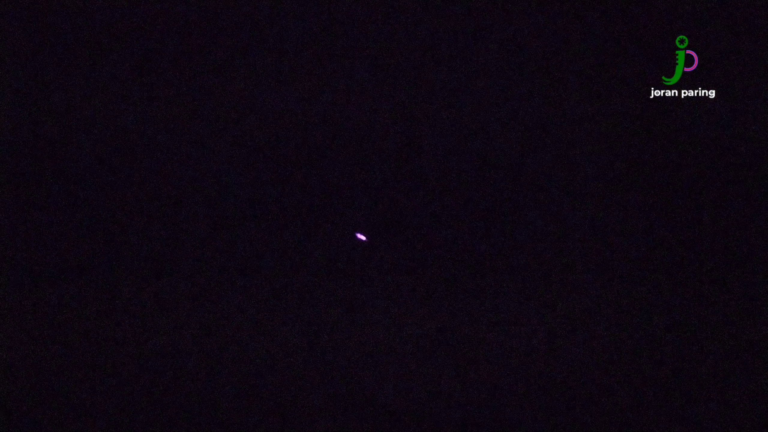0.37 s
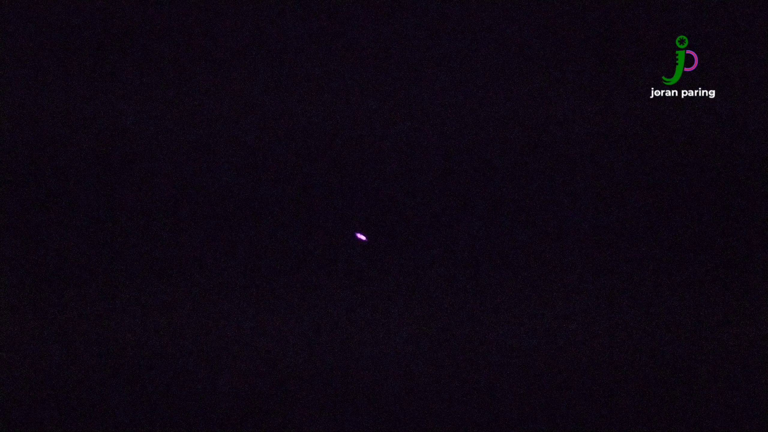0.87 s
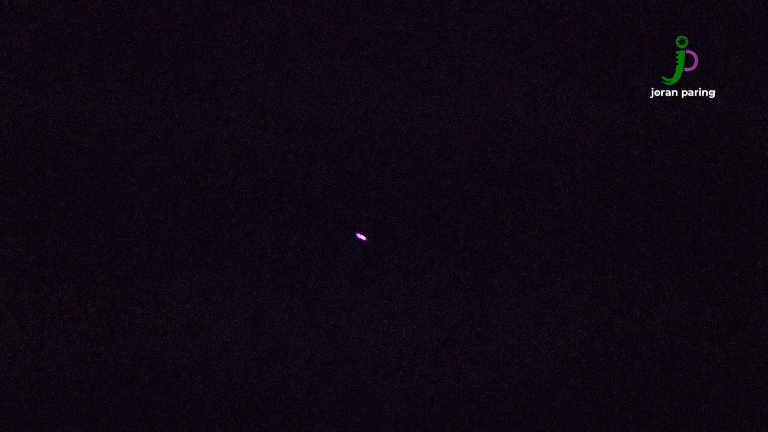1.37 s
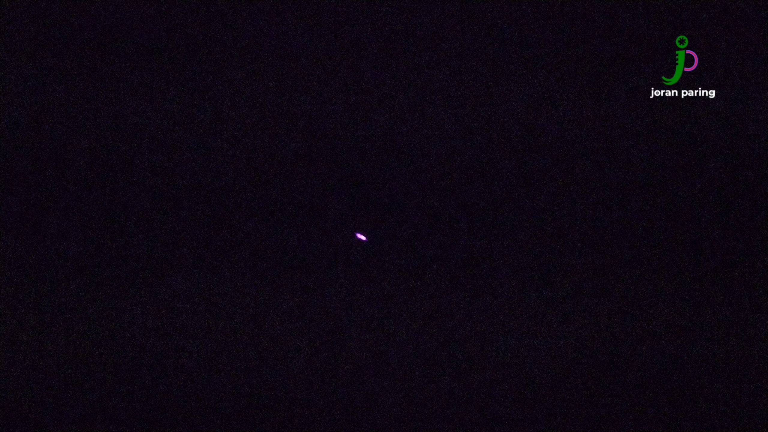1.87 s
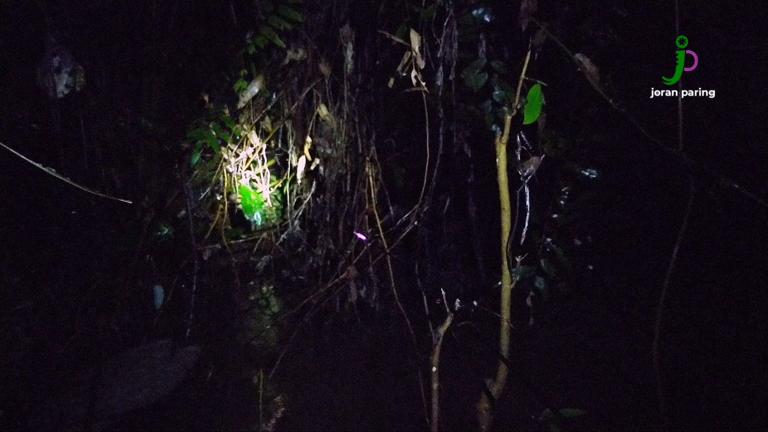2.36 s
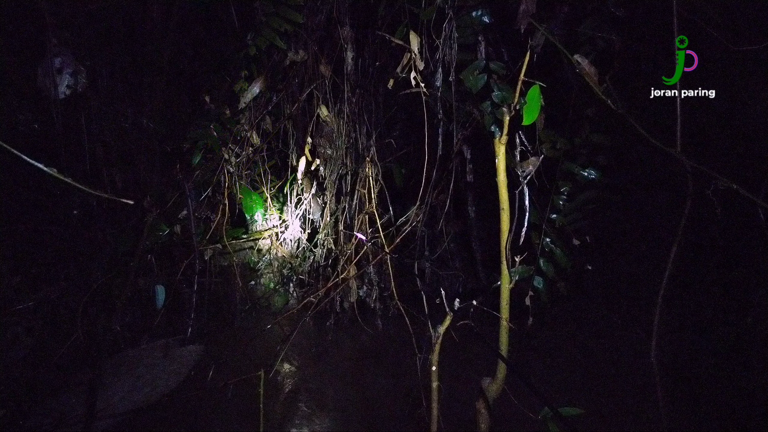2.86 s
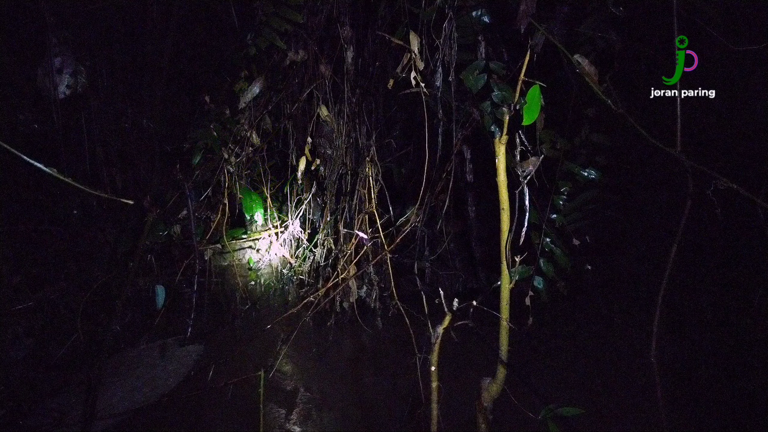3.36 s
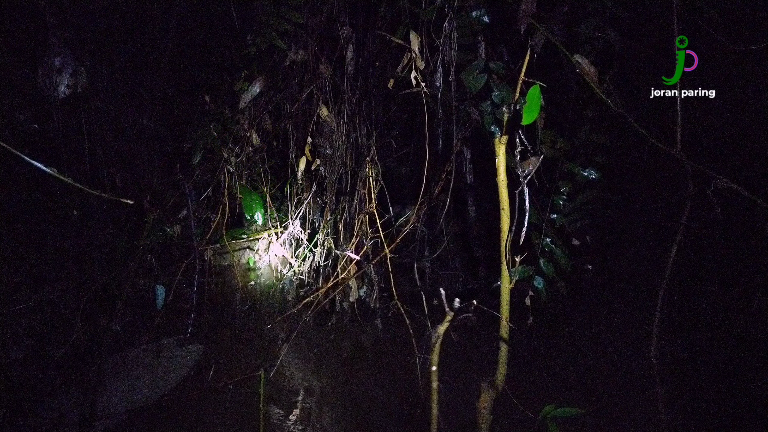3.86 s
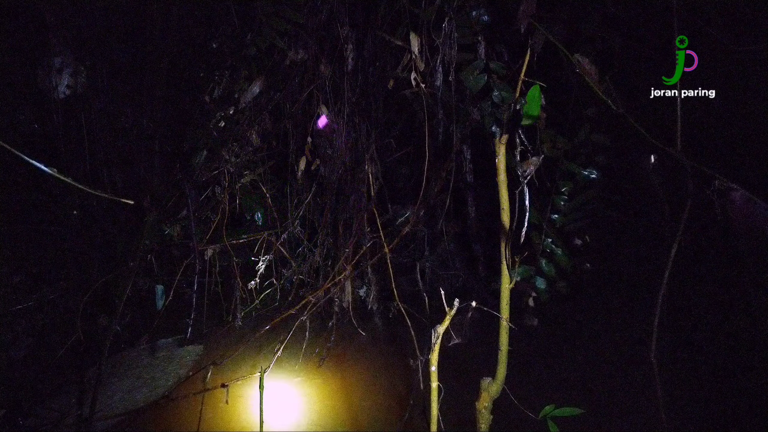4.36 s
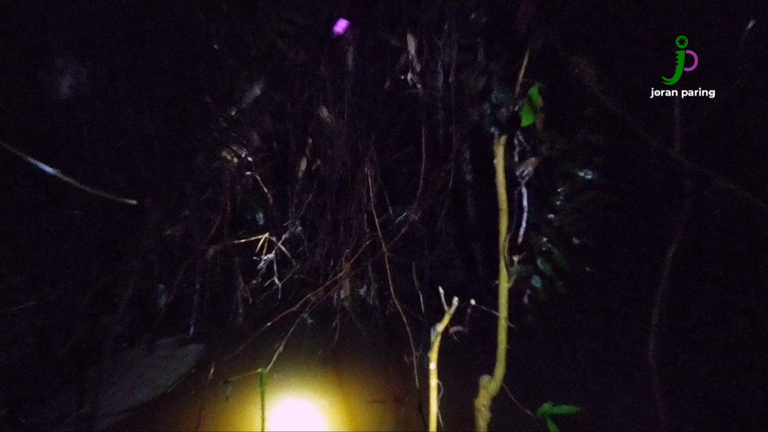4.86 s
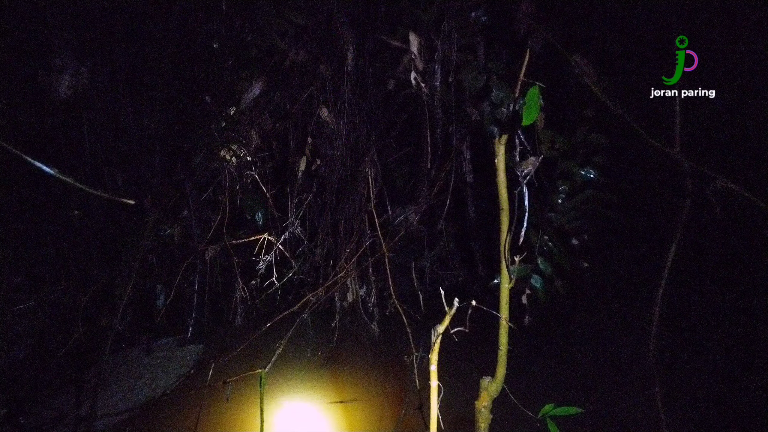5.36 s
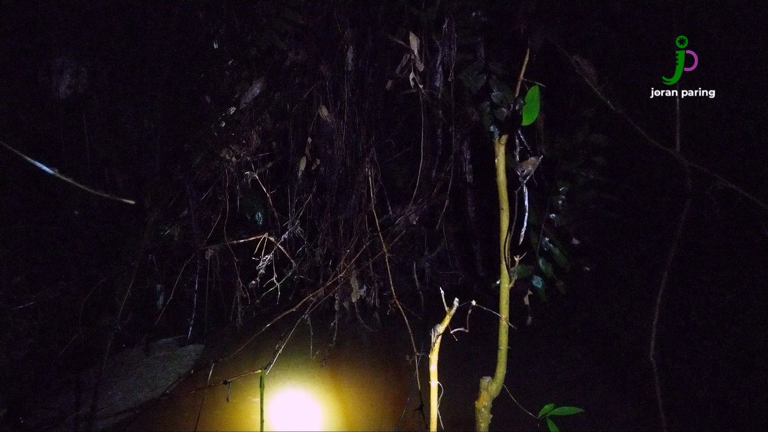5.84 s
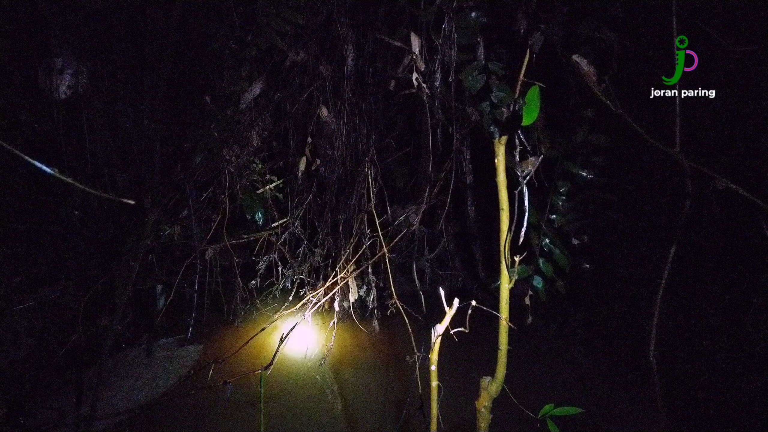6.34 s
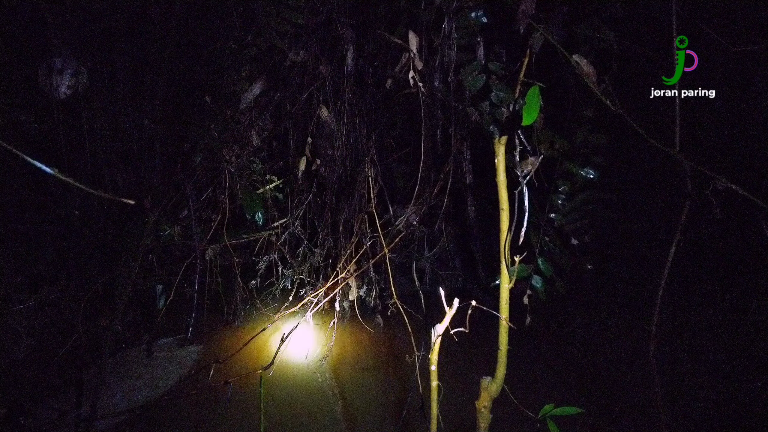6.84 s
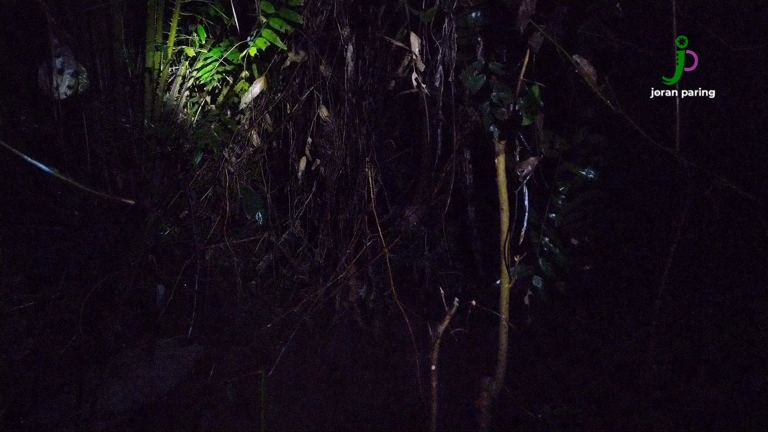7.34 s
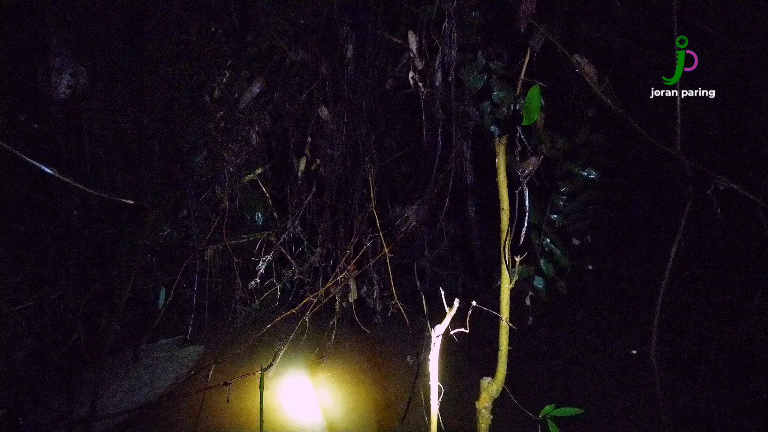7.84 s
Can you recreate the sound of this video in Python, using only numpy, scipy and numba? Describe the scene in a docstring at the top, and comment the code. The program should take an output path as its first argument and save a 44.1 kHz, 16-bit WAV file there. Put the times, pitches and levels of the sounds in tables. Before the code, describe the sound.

Quiet night beside a flooded, wooded ditch, heard through a hand-held stereo recorder. Distant insects shimmer and chirp over a low engine hum while cloth and leaves rustle close by. A loud torch click comes at two seconds, a second soon after, and a near cricket begins a high, rapid trill, stronger on the right. Twigs snap at four seconds; the trill stops around five and returns near the end.

```python
"""Beside a flooded wooded ditch at night, a near cricket trills in long bouts, louder on the right.
It sings by stridulation, three tone bursts a wing stroke; other insects call and chirp further off over a chorus.
A torch switch, twigs and knocks ring as decaying modes; cloth and leaves rustle as uneven noise.
Water plops are gliding bubble tones, distant engines are wavering sines, and air and wind are coloured noise.
Two ports of a hand-held recorder take it all in, and its limiter ducks after the loudest click."""
import sys
import numpy as np
from scipy import signal
from scipy.fft import rfft, irfft, next_fast_len
from scipy.io import wavfile
from scipy.ndimage import uniform_filter1d
from numba import njit

SR = 44100
rng = np.random.default_rng(int(sys.argv[2]) if len(sys.argv) > 2 else 0)


def magnitude_from_level(level_db):
    """Linear magnitude for a level in decibels (20 dB per decade)."""
    exponent = np.asarray(level_db, float) / 20
    return 10 ** exponent


def dump(signal):
    """Clip the signal to [-1, 1] and save it as 16-bit WAV at the path in sys.argv[1]."""
    limited = np.clip(np.atleast_2d(signal).T, -1, 1)
    pcm = np.round(limited * 32767).astype(np.int16)
    wavfile.write(sys.argv[1], SR, pcm)


N = 362061
T = np.arange(N) / SR

# near cricket bouts: (start [s], end [s], settled level [dB], share of a stroke done at the first pace row [0-1])
BOUTS = [(2.128, 5.081, -30, .29), (7.482, 8.3, -30, .426)]
# wing pace, one list a bout: (time [s], rate [strokes/s])
STROKE_PACE = [
    [(2.14, 67.32), (2.506, 66.34), (2.873, 66.0), (3.239, 65.82), (3.605, 65.66), (3.971, 66.14),
     (4.338, 64.6), (4.704, 65.79), (5.07, 64.12)],
    [(7.5, 66.61), (7.733, 67.32), (7.967, 65.58), (8.2, 67.02)],
]
# lead, main and trailing bursts of a stroke:
# (place in stroke [0-1], pitch above the wing [Hz], time to peak once the outer bursts have grown [s])
BURSTS = [(.03, 250, .0012), (.29, -10, .0016), (.57, 130, .0012)]
WING_HZ, COLD_DROP_HZ, WARM_S = 7808, 167, 0.36  # the wing starts flat and settles as it warms
SLUR_HZ, SLUR_S = 60, .04  # the first strokes slur up from below
ATTACK_S, RELEASE_S, FRESH_DB, TIRE_S = 0.04, 0.02, 1.5, 0.6  # a bout opens louder, then eases
LEAD_DB, TRAIL_DB = -4.5, -7  # outer bursts at full strength
LEAD_LATE_DB, LEAD_S, TRAIL_LATE_DB, TRAIL_S = -30, .33, -11, .55  # their shortfall at first and growth time
LONG_AT_FIRST = .55  # bursts start longer by this share, easing with the trailing burst's growth

# short calls further off: (start [s], end [s], pitch [Hz], rate [strokes/s], level [dB], left minus right [dB])
FAR_CALLS = [(1.85, 1.99, 8680, 100, -49, 12), (1.92, 2.35, 8980, 100, -46.5, 13),
             (1.865, 1.975, 3850, 90, -43, 0), (5.58, 5.674, 7250, 16, -44, -6),
             (5.86, 6.0, 7360, 16, -49, -11)]
# two chirping crickets, lower then upper: (middle of chirp [s], relative level [dB])
CHIRPS = [
    [(.1, -44.5), (.25, -41), (.77, -38), (1.29, -40), (1.74, -39), (2.2, -37.5), (2.68, -41), (3.16, -42),
     (3.57, -40), (4.17, -43), (4.63, -40.5), (5.2, -43.5), (5.7, -42), (6.15, -40), (6.53, -38),
     (7.0, -39), (7.31, -44), (7.67, -42), (7.82, -45), (8.09, -42)],
    [(.24, -50), (.67, -40), (1.16, -43), (1.48, -40), (2.03, -39), (2.84, -45), (4.27, -49), (4.62, -48),
     (5.84, -42), (6.3, -44), (7.17, -39), (7.82, -48), (8.1, -45)],
]
# one entry a chirping cricket: (pitch [Hz])
CHIRP_HZ = (5040, 5140)
# one entry a chirping cricket: (rate [strokes/s])
CHIRP_RATE = (41, 38)
CHIRP_HALF_S = 0.09  # a chirp swells and fades over about twice this
CHIRP_LEFT_LAG_S = .0001  # offsets part of the right port's lag
# bands of massed distant insects: (centre [Hz], width [Hz], level [dB])
CHORUS = [(4900, 2060, -49.5), (6240, 300, -57.5), (6870, 420, -60), (8490, 1200, -53.5),
          (10500, 1100, -64)]

# torch switch clicks, runs of ticks:
# (loudest tick [s], peak [dB], its tilt [dB/octave], gap between ticks [s], build-up a tick [dB])
SWITCH = [(2.0394, 0, 2.5, 0.0018, 41), (2.2739, 11.5, 11, 0.0018, 18.5)]
# switch resonances: (frequency [Hz], relative level [dB], free t60 [s])
SWITCH_MODES = [(2030, -4, 0.019), (2360, -20, 0.013), (3600, -7.5, 0.0087), (4180, 2.5, 0.014),
                (4920, -5, 0.0066), (6470, 4, 0.0075), (7140, 4, 0.0076), (8810, -9, 0.024),
                (10140, -17, 0.0061), (12300, -19, 0.0044)]
# one entry a click: (share of the ring times left by the fingers [0-1])
SWITCH_RING_SHARES = (1, .7)
# twig snaps, runs of ticks:
# (loudest tick [s], peak [dB], its tilt [dB/octave], gap between ticks [s], build-up a tick [dB])
SNAPS = [(3.9995, -11.5, 9.2, .0013, 3.8)]
# single twig crackles: (time [s], peak [dB], tilt [dB/octave])
TWIGS = [(1.0799, -20.5, 1), (3.9332, -22, -4), (3.9655, -22, -5), (7.309, -19.5, -3), (7.781, -17, -24),
         (7.855, -22, 0)]
# resonances of all twigs: (frequency [Hz], relative level [dB], t60 [s])
TWIG_MODES = [(1750, -15, 0.0024), (3700, 8, 0.005), (6370, 8.5, 0.0036), (8160, 2, 0.013),
              (10430, -4, 0.0083), (13700, -16, 0.003)]
SWITCH_FALL_DB, SNAP_FALL_DB = 8, 5  # level lost a tick after the loudest
DULLING_DB = 3.5  # tilt lost a tick either side, dB/octave
# dull knocks on something held: (time [s], peak [dB], tilt [dB/octave])
KNOCKS = [(3.061, -26, -8), (3.402, -38, 3), (3.808, -27, 5), (3.814, -26, -1), (4.2925, -26, -1),
          (4.296, -25, -3), (4.813, -28.5, -5), (5.564, -38, 0), (5.721, -31, 5), (6.258, -30, -2),
          (6.727, -35, -2), (7.308, -23, -2)]
# knock resonances: (frequency [Hz], relative level [dB], t60 [s])
KNOCK_MODES = [(430, -7, .04), (590, -7, .035), (840, 0, .045), (980, 1, .045), (1420, 0, .035),
               (1850, -5, .03), (2800, -7, .015)]

# steady fidget of cloth and leaves: (time [s], bright rustle [dB], low rub [dB])
RUSTLE = [(0, -48, -52), (.7, -50.5, -53.5), (2.0, -50.5, -55.5), (2.5, -49, -55), (3.2, -57, -64),
          (3.45, -45.5, -54), (3.65, -38.5, -55.5), (3.95, -49.5, -54.5), (4.4, -52.5, -57.5),
          (5.2, -54, -59.5), (5.9, -50, -53.5), (6.6, -54.5, -56.5), (7.2, -48, -56), (7.765, -49, -53),
          (7.785, -43, -42), (7.97, -46.5, -48.5), (8.21, -46, -42.5)]
# single swishes: (peak [s], rise [s], bright rustle [dB], low rub [dB])
SWISHES = [(0.01, 0.036, -41.5, -60), (.18, 0.014, -39, -47), (.89, 0.03, -45, -54), (1.05, 0.04, -42, -59),
           (1.46, 0.05, -49, -50), (1.93, 0.024, -56, -54), (2.384, 0.029, -38, -65), (3.07, .04, -51, -53),
           (3.58, 0.068, -38, -47), (3.7, 0.057, -49, -61), (3.83, 0.022, -47, -46),
           (4.03, 0.06, -40, -49.5), (4.9, 0.068, -46.5, -60), (4.99, 0.01, -42, -57),
           (5.1, 0.03, -47, -68), (5.25, 0.03, -55, -60), (5.4, 0.035, -45, -67), (5.71, 0.026, -59, -53),
           (6.93, 0.061, -53, -61), (7.29, 0.026, -46, -50), (7.86, 0.038, -39.5, -38.5),
           (8.07, 0.061, -43, -43), (8.15, .06, -45, -49)]
FADE = 0.98  # a swish dies over this times its rise
# bands of the low rub: (centre [Hz], width [Hz], relative level [dB])
RUB = [(845, 870, 1), (1456, 740, -4.5), (2098, 1810, 4.5), (4010, 850, 0), (4890, 1980, 1)]
# brief narrow hisses, as of leaves brushing: (middle [s], half length [s], pitch [Hz], width [Hz], level [dB])
HISSES = [(0.16, 0.018, 10600, 1500, -49.5), (0.488, .015, 10400, 1500, -52),
          (3.05, 0.055, 12400, 1500, -58), (3.579, 0.018, 10500, 900, -38),
          (3.615, 0.091, 3100, 1500, -44.5), (3.44, .05, 3000, 1500, -53), (3.75, .05, 2980, 1500, -50),
          (3.811, .008, 2700, 900, -36.5), (3.95, 0.031, 10800, 900, -48),
          (3.999, 0.0036, 10700, 1600, -23.5), (4.85, .012, 13000, 3000, -54),
          (5.26, .045, 11500, 600, -61), (5.585, 0.054, 10900, 900, -56), (5.78, .035, 12800, 2000, -58),
          (5.89, .025, 10200, 900, -53), (5.99, .035, 13000, 1500, -59), (6.963, .06, 10800, 700, -57),
          (7.205, 0.016, 10900, 400, -60), (7.302, .012, 11300, 900, -53), (7.58, .01, 12500, 1200, -56),
          (7.67, .01, 13800, 1200, -56), (8.165, .01, 10500, 1200, -48)]
HISS_LEFT_LAG_S = .00025  # the leaves brush nearer the middle than the hand
# water plops: (time [s], peak [dB], starting pitch [Hz])
PLOPS = [(5.745, -42, 650), (6.435, -40, 610), (6.454, -42, 580), (6.587, -42, 557), (6.881, -40.5, 557),
         (7.606, -42, 605)]
PLOP_T60_S = .06

# distant engines: (time [s], drone [dB], second engine [dB], deep throb [dB])
ENGINES = [(0, -55, -58, -58), (.5, -58.5, -52, -49), (2.2, -56, -54, -50), (3, -55, -56.5, -60),
           (4, -53.5, -57, -54), (5.5, -51.5, -60.5, -64), (7, -53, -55, -47), (8.21, -53, -57.5, -54)]
# firing orders of the second engine: (multiple of the firing rate, relative level [dB])
FIRING_ORDERS = [(3, -11.5), (4, 2.5), (5, -2), (6, -5.5), (7, -13), (8, -18.5)]
# thin whines: (pitch [Hz], level [dB])
WHINES = [(1277, -69), (1386, -66)]
DRONE_HZ, DRONE_RISE_HZ_PER_S, FIRE_HZ, FIRE_RISE_HZ_PER_S = 143, 1.75, 43.7, .1
THROB_HZ = 52.6
# light wind on the ports: (time [s], level [dB])
WIND = [(0, -47.5), (.25, -50), (1.2, -50.5), (2.2, -54), (3, -76), (7.8, -63), (8.21, -66)]
# wind spectrum: (frequency [Hz], relative level [dB])
WIND_COLOUR = [(15, -1), (30, -5), (60, 1), (200, -4.5), (450, -11), (700, -23), (2000, -58)]
# night air spectrum: (frequency [Hz], relative density [dB])
AIR_COLOUR = [(12, -7), (20, 6.5), (45, 2.5), (100, -5), (160, -1.5), (560, -16), (1090, -15.5),
              (1400, -13), (2300, -20), (3300, -17.5), (4250, -27), (5850, -36), (8000, -13.5),
              (11100, -44), (15800, -21.5)]
AIR_DB = -45
# night air at the two ports: (frequency [Hz], left-right likeness [0-1])
LIKENESS = [(20, 0.09), (150, 1), (300, 0.53), (800, 0.33), (2500, 0), (6000, 0.12), (16000, 0.65)]

# port colour, with less treble at the right: (frequency [Hz], left minus right [dB])
PORTS = [(60, 0), (2400, -1.5), (4400, -1), (7000, -3), (8800, 4.5), (9800, 32), (12000, 44.5), (16000, 6)]
# response that dips in two narrow treble bands: (frequency [Hz], level [dB])
TREBLE_DIPS = [(3700, 0), (4230, -5), (4550, 2), (5250, 2.5), (5800, -3.5), (6150, 0.5)]
RIGHT_LAG_S = .00049  # sound reaches the right port later
TOP_HZ = 15800


def colour(x, points):
    """Linear filtering: multiply the spectrum by a gain drawn through (frequency [Hz], level [dB]) points."""
    hz, db = np.transpose(points)
    size = next_fast_len(N)
    f = np.maximum(np.arange(size // 2 + 1) * SR / size, 1)
    gain = magnitude_from_level(np.interp(np.log(f), np.log(hz), db))
    return irfft(rfft(x, size) * gain, size)[..., :N]


def band(x, hz, width):
    """Resonance: a second-order peak applied twice, scaled to rms 1."""
    b, a = signal.iirpeak(hz, hz / width, SR)
    y = signal.lfilter(b, a, signal.lfilter(b, a, x))
    return y / np.sqrt(np.mean(y ** 2))


def walk(rate):
    """Low-passed chance: random levels, rate a second, joined smoothly with a spread near 1."""
    k = int(SR / rate)
    held = np.repeat(rng.standard_normal(N // k + 1), k)
    return 1.358 * uniform_filter1d(uniform_filter1d(held, k), k)[:N]


def place(x, pan_db):
    """Level difference between the ports: share a sound left and right, pan_db louder at the left."""
    return x * magnitude_from_level(np.array([[pan_db / 2], [-pan_db / 2]]))


def wood(x, t60, wet_db):
    """Multiple scattering: trunks and leaves return a fading noise tail, unrelated left and right."""
    t = T[:int(t60 * SR)]
    tail = rng.standard_normal((2, len(t))) * np.exp(-np.log(1000) * t / t60)
    tail = tail * (t > .002)
    tail = tail / np.sqrt(np.sum(tail ** 2, axis=1, keepdims=True))
    return magnitude_from_level(wet_db) * signal.fftconvolve(x[None], tail, axes=1)[:, :N]


def burst(strokes, rate, hz, at, half, slip, scatter_db, scatter_hz):
    """Stridulation: one tone burst a stroke, quick to rise and slower to die, varying in phase, size and pitch."""
    chance = rng.standard_normal((int(strokes.max()) + 1, 3))[strokes.astype(int)].T
    t = np.maximum(strokes % 1 - at, 0) / rate
    envelope = (t / half * np.exp(1 - t / half)) ** 2
    tone = np.sin(2 * np.pi * (hz + scatter_hz * chance[2]) * t + slip * chance[0])
    return magnitude_from_level(scatter_db * chance[1]) * envelope * tone


def ring(ticks, modes, crack_db):
    """Modal decay: each tick cracks and rings the modes anew, brighter or duller by its tilt."""
    out = np.zeros(N)
    hz, db, t60 = np.array(modes).T[..., None]
    t = T[:3000]
    chances = rng.standard_normal((len(ticks), 2, len(modes), 1))
    for (s, peak_db, tilt_db), (detune, phase) in zip(ticks, chances):
        gain = magnitude_from_level(db + tilt_db * np.log2(hz / np.median(hz)))
        decay = np.exp(-np.log(1000) * t / t60)
        tones = np.sin(2 * np.pi * hz * (1 + 0.043 * detune) * t + 0.99 * phase)
        y = np.sum(gain * decay * tones, axis=0)
        crack = np.diff(rng.standard_normal(len(t) + 1)) * np.exp(-t / 0.00071)
        y = y / np.abs(y).max() + magnitude_from_level(crack_db + min(tilt_db, 0)) * crack
        start = int(s * SR)
        out[start:start + len(t)] += magnitude_from_level(peak_db) * y * np.minimum(t / 0.0004, 1)
    return out


def run_of(rows, fall_db):
    """Successive impacts: two ticks either side of the loudest, weaker and duller the further off."""
    return [(s + k * gap, db + (k * rise_db if k < 0 else -k * fall_db), tilt_db - DULLING_DB * abs(k))
            for s, db, tilt_db, gap, rise_db in rows for k in range(-2, 3)]


def near_cricket():
    """Stridulation: every stroke scrapes out three bursts; the outer two grow as the bout goes on."""
    out = np.zeros(N)
    for (start, end, db, share), pace in zip(BOUTS, STROKE_PACE):
        age = np.maximum(T - start, 0)
        hz = WING_HZ - COLD_DROP_HZ * np.exp(-age / WARM_S) - SLUR_HZ * np.exp(-age / SLUR_S)
        lead_db = LEAD_DB + LEAD_LATE_DB * np.exp(-(age / LEAD_S) ** 2)
        trail_db = TRAIL_DB + TRAIL_LATE_DB * np.exp(-(age / TRAIL_S) ** 2)
        stretch = 1 + LONG_AT_FIRST * np.exp(-(age / TRAIL_S) ** 2)
        rate = np.interp(T, *np.transpose(pace))
        done = np.cumsum(rate) / SR
        # ten spare strokes lead in, and burst places count from mid-stroke
        strokes = np.maximum(done - np.interp(pace[0][0], T, done) + share + 10.5, 0)
        song = 0
        for burst_db, (at, up_hz, half) in zip((lead_db, 0, trail_db), BURSTS):
            song = song + magnitude_from_level(burst_db) * burst(strokes, rate, hz + up_hz, at, half * stretch, slip=0.6,
                                                scatter_db=1.3, scatter_hz=18 / stretch ** 4)
        gate = np.clip(np.minimum(age / ATTACK_S, (end - T) / RELEASE_S), 0, 1)
        out += song * gate * magnitude_from_level(db + FRESH_DB * np.exp(-(age / TIRE_S) ** 2))
    return place(out, -10) + wood(out, 0.24, -11.5)


def far_calls():
    """Stridulation at a distance: short calls heard directly and scattered by the wood."""
    out = np.zeros((2, N))
    for start, end, hz, rate, db, pan_db in FAR_CALLS:
        gate = np.clip(np.minimum(T - start, end - T) / .05, 0, 1)
        song = burst(T * rate, rate, hz, 0.16, 0.29 / rate, slip=np.pi, scatter_db=3, scatter_hz=35)
        out += place(gate * magnitude_from_level(db) * song, pan_db)
    return out + wood(out.mean(axis=0), .15, -2)


def chirping_crickets():
    """Amplitude modulation: soft swells gather wing strokes into chirps, direct and scattered."""
    chirps = 0
    for rows, hz, rate in zip(CHIRPS, CHIRP_HZ, CHIRP_RATE):
        swell = sum(magnitude_from_level(db) * np.exp(-((T - s) / CHIRP_HALF_S) ** 2) for s, db in rows)
        song = burst(T * rate, rate, hz, .1, .004, slip=np.pi, scatter_db=2.5, scatter_hz=60)
        chirps = chirps + swell * song
    direct = magnitude_from_level(-7.5) * np.array([np.roll(chirps, int(CHIRP_LEFT_LAG_S * SR)), chirps])
    return direct + wood(chirps, .2, -6)


def chorus():
    """Incoherent superposition: massed insects merge into noise bands whose levels swell and flicker."""
    swell_db, flicker_db = .8, 1.5
    return sum(magnitude_from_level(db + swell_db * walk(3.21) + flicker_db * walk(25))
               * band(rng.standard_normal((2, N)), hz, width) for hz, width, db in CHORUS)


def held_things():
    """Modal decay: switch and twigs ring differently towards each port, knocks ring alike at both."""
    switch = np.zeros((2, N))
    for row, share in zip(SWITCH, SWITCH_RING_SHARES):
        ticks, modes = run_of([row], SWITCH_FALL_DB), np.array(SWITCH_MODES) * (1, 1, share)
        switch += np.array([ring(ticks, modes, -22.0) for port in range(2)])
    cracks = TWIGS + run_of(SNAPS, SNAP_FALL_DB)
    twigs = np.array([ring(cracks, TWIG_MODES, -8) for port in range(2)])
    knocks = ring(KNOCKS, KNOCK_MODES, -16)
    scattered = wood(switch[0] + twigs[0] + knocks, .05, -38)
    return place(switch, 1.7) + place(twigs, 4.4) + knocks + scattered


def rustle():
    """Stick-slip friction: fibres slip in dense clicks of uneven size, a bright hiss and a lower rub in the folds."""
    s, *steady_db = np.transpose(RUSTLE)
    wander_db = 1.1 * walk(9)
    power = magnitude_from_level(np.array([np.interp(T, s, db) + wander_db for db in steady_db])) ** 2
    for at, rise, *db in SWISHES:
        shape = np.exp(-2 * np.maximum((at - T) / rise, (T - at) / (FADE * rise)))
        power = power + magnitude_from_level(np.array(db)[:, None]) ** 2 * shape
    sizes = magnitude_from_level(3.0 * np.minimum(rng.exponential(size=(3, N)), 7))
    slips = rng.standard_normal((3, N)) * sizes * magnitude_from_level(1.8 * walk(60))
    bright = band(slips[:2], 7240, 4840) * np.sqrt(power[0])
    folds = slips[2] + .75 * slips[:2]  # one spot, so much alike at both ports
    rub = sum(magnitude_from_level(db) * band(folds, hz, width) for hz, width, db in RUB)
    return bright + place(rub * np.sqrt(power[1]), 3.2)


def hisses():
    """Band-limited noise: grains of uneven size in one narrow band swell and fade."""
    grain = rng.standard_normal(N) * magnitude_from_level(2.5 * np.minimum(rng.exponential(size=N), 6))
    out = np.zeros(N)
    for s, half, hz, width, db in HISSES:
        out += magnitude_from_level(db) * np.exp(-((T - s) / half) ** 2) * band(grain, hz, width)
    return np.array([np.roll(out, int(HISS_LEFT_LAG_S * SR)), out])


def plops():
    """Bubble resonance: air pockets ring briefly, gliding up as they close."""
    out, t = np.zeros(N), T[:6000]
    envelope = np.exp(-np.log(1000) * t / PLOP_T60_S) * np.minimum(t / 0.00039, 1)
    for s, db, hz in PLOPS:
        start = int(s * SR)
        out[start:start + len(t)] += magnitude_from_level(db) * envelope * np.sin(2 * np.pi * hz * t * (1 + 0.41 * t))
    return out + wood(out, .12, -4)


def engines():
    """Harmonic radiation: a rising drone, a stack of firing orders, a deep throb and two thin whines."""
    s, *columns = np.transpose(ENGINES)
    drone_db, fire_db, throb_db = (np.interp(T, s, c) for c in columns)
    drone_hz = DRONE_HZ + DRONE_RISE_HZ_PER_S * T
    fire_hz = FIRE_HZ + FIRE_RISE_HZ_PER_S * T
    orders = [(k * fire_hz, fire_db + db) for k, db in FIRING_ORDERS]
    lines = [(drone_hz, drone_db), (THROB_HZ, throb_db)] + orders + WHINES
    # the long path through moving air makes each line fade, flutter and drift alone, not quite alike at the ports
    fade_db, flutter_db, drift_hz = 2, 1.6, 1.0
    out = 0
    for hz, db in lines:
        level = np.sqrt(2) * magnitude_from_level(db + fade_db * walk(3.15) + flutter_db * walk(12))
        phase = 2 * np.pi * np.cumsum(hz + drift_hz * walk(4)) / SR
        out = out + level * np.sin(phase + 0.54 * np.array([walk(6), walk(6)]))
    return out


def wind():
    """Turbulent pressure: low noise, partly shared by the ports, rumbles most at first."""
    gusts = colour(rng.standard_normal(N) + .5 * rng.standard_normal((2, N)), WIND_COLOUR)
    level = magnitude_from_level(np.interp(T, *np.transpose(WIND)) + 2 * walk(8.4))
    return level * gusts / np.sqrt(np.mean(gusts ** 2))


def air():
    """Partial coherence: broad night noise mixes shared and separate parts by the likeness at each frequency."""
    hz, like = np.transpose(LIKENESS)
    like = np.clip(like, .01, .99)
    shared = colour(rng.standard_normal(N), np.c_[hz, 10 * np.log10(like)])
    own = colour(rng.standard_normal((2, N)), np.c_[hz, 10 * np.log10(1 - like)])
    noise = colour(shared + own, AIR_COLOUR)
    return magnitude_from_level(AIR_DB) * noise / np.sqrt(np.mean(noise ** 2))


def scene():
    """Superposition: the pressures of all sources add at the two ports."""
    insects = near_cricket() + far_calls() + chirping_crickets() + chorus()
    close_by = held_things() + rustle() + hisses()
    return insects + close_by + plops() + engines() + wind() + air()


@njit
def limit(peak, top, attack, release):
    """Gain control: gain falls fast while the output tops the ceiling and creeps back afterwards."""
    gain, g = np.empty(len(peak)), 1.
    for i in range(len(peak)):
        if g * peak[i] > top:
            g += (top / peak[i] - g) * attack
        else:
            g += (1 - g) * release
        gain[i] = g
    return gain


def low_pass(x):
    """Removes everything above the highest recorded frequency."""
    return signal.sosfilt(signal.butter(12, 15900, fs=SR, output="sos"), x)


def record(dry):
    """Linear filtering and limiting: port colour, treble dips, port lag, a slow-release limiter, a hard ceiling, a cut top."""
    hz, db = np.transpose(PORTS)
    left = colour(dry[0], np.c_[hz, db / 4])
    right = colour(dry[1], np.c_[hz, -db * 3 / 4])
    x = colour(np.array([left, np.roll(right, int(RIGHT_LAG_S * SR))]), TREBLE_DIPS)
    attack_s, release_s, top = .00015, .9, .75
    gain = limit(np.abs(x).max(axis=0), top, 1 / (attack_s * SR), 1 / (release_s * SR))
    x = np.clip(x * gain, -.88, .88)
    x = signal.sosfilt(signal.ellip(8, .2, 70, TOP_HZ, fs=SR, output="sos"), x)
    return low_pass(x)


dry = scene()
out = record(dry)
dump(out)
```